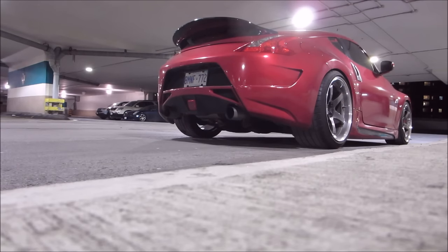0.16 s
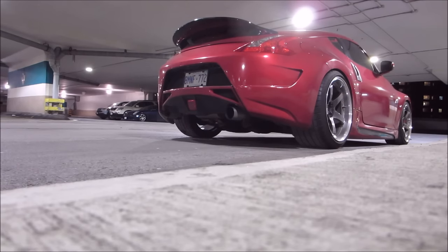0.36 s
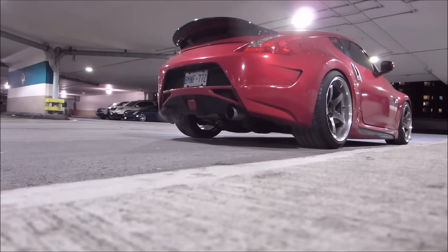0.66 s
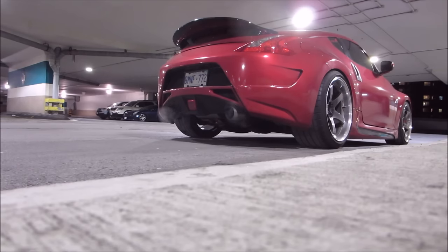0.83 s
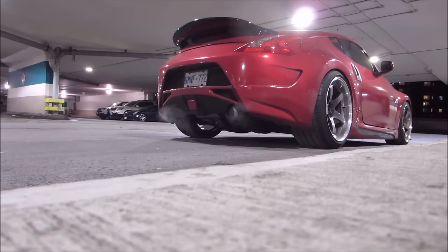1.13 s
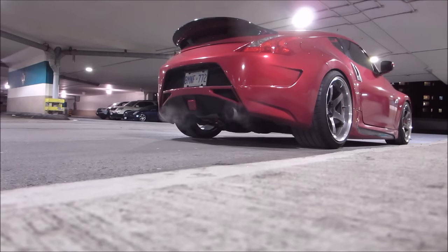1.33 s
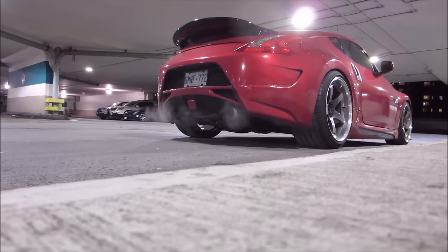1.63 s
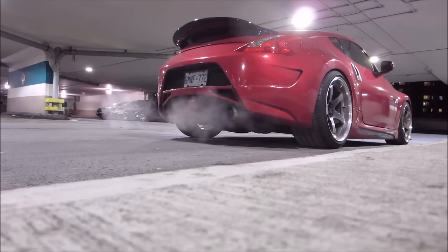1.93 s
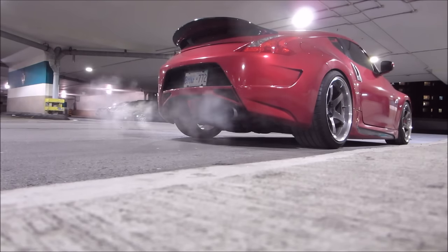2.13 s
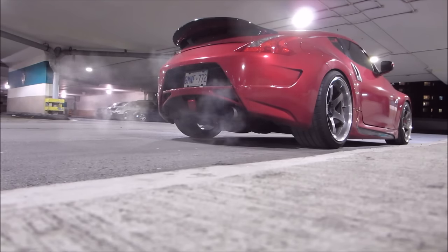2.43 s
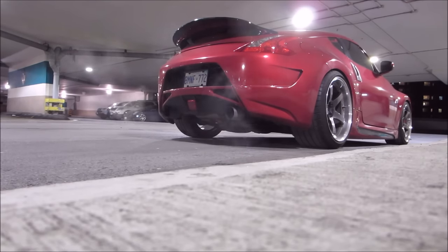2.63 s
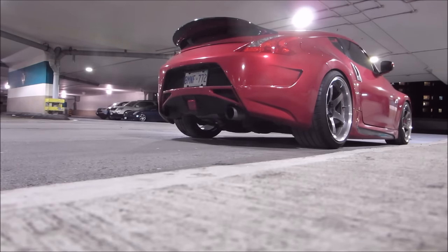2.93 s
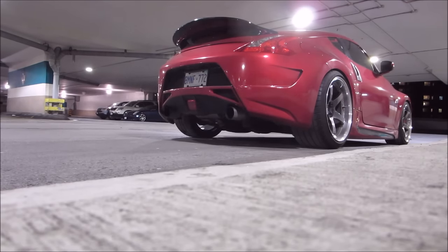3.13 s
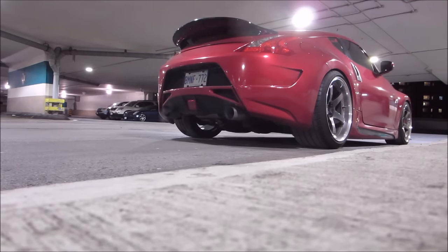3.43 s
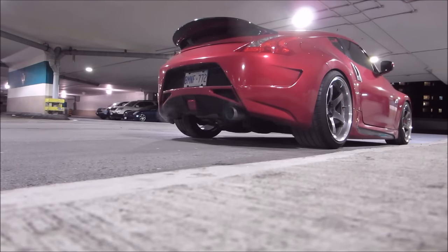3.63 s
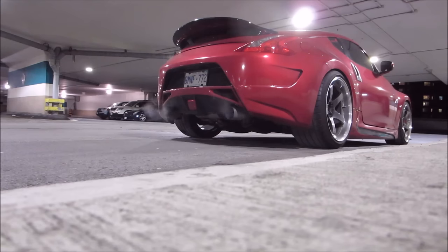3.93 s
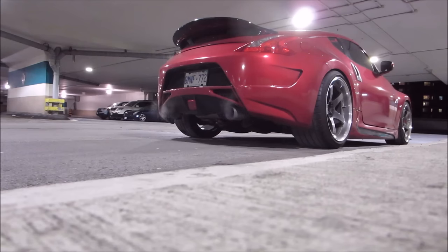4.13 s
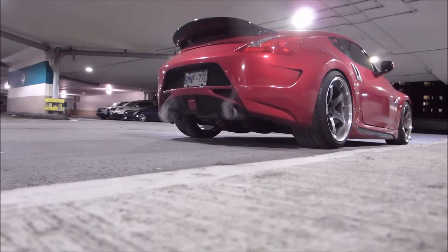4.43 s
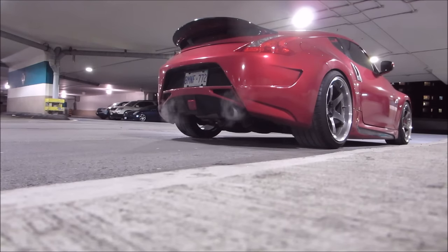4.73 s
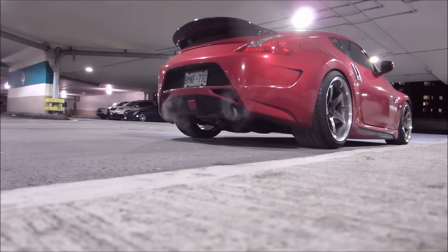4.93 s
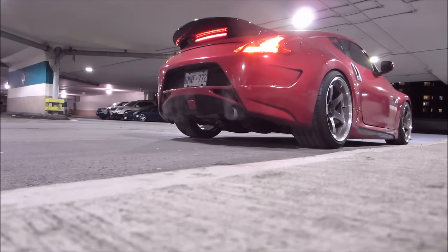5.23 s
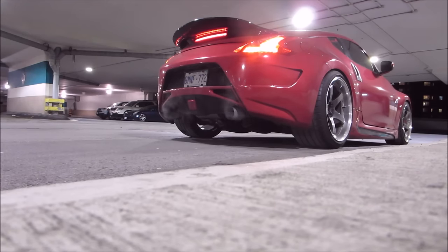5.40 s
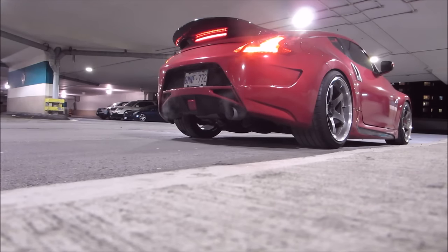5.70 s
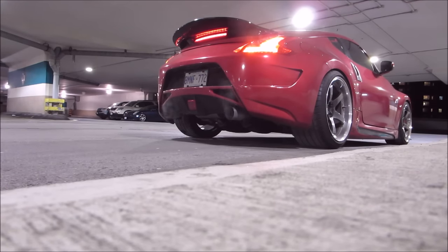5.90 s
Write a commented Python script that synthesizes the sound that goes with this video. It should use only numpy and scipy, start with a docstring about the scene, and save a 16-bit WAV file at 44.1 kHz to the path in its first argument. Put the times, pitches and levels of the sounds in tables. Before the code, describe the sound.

Loud exhaust blips and one hard, cracking rev boom through a concrete garage before the car settles into a low, uneven idle.

```python
"""Sports car revving in a concrete garage

A six-cylinder with an open exhaust sinks from one blip, flares again, crackles on the overrun and
settles to a lumpy idle. Each firing booms and barks through the pipes; the hardest ones crack.
Belts, fans and intake air sit underneath, and the brakes squeak faintly near the end.
The concrete answers with a long low tail, and a limiter holds down the loudest peaks."""
import sys
import numpy as np
from scipy import signal
from scipy.fft import rfft, irfft, next_fast_len
from scipy.io import wavfile
from scipy.ndimage import uniform_filter1d, minimum_filter1d, map_coordinates

SR = 44100
rng = np.random.default_rng(int(sys.argv[2]) if len(sys.argv) > 2 else 0)


def transcribe(u):
    """Save the signal u as a 16-bit wav file named by the first command-line argument.

    u: samples, shape (n,) or (channels, n), limited to [-1, 1]; the rate is SR.
    q: integer samples, one column per channel.
    """
    v = np.clip(np.atleast_2d(u).T, -1, 1)
    q = np.round(v * 32767).astype(np.int16)
    wavfile.write(sys.argv[1], SR, q)


N = 267246

# reverb time of the garage: f/Hz, t60/s
GARAGE_DECAY = [(100, 2.2), (300, 2.36), (600, 0.61), (1500, 0.49), (4000, 0.2), (12000, 0.26)]
# low standing waves of the garage: f/Hz, width/Hz, resonance against dry/dB
GARAGE_MODES = [(65.5, 3.1, -7), (196.7, 3.6, -2.5)]
# base stereo width of a diffuse field: f/Hz, side against mid/dB
STEREO_WIDTH = [(30, -22), (80, -59.5), (170, -26.5), (350, -15.5), (700, -10), (1400, -7), (2800, -5.5),
                (5500, -2.5), (12000, -0.5)]

# colour of the engine bay's whir: f/Hz, level/dB
WHIR_COLOUR = [(25, -21.5), (70, -7.5), (167, 1.5), (326, -12.5), (488, -16.5), (730, -17.5), (1210, -25.5),
               (1600, -30), (2850, -38), (4150, -48.5), (8000, -58.5), (15000, -83)]
# fader for belts, fans and, as the car creeps off, tyres: t/s, level/dB
WHIR_LEVEL = [(0, -35.5), (4.3, -37), (5, -36.5), (5.5, -34.5), (6.06, -31.5)]
# faint accessory whines: f/Hz, level/dB
ACCESSORY_WHINES = [(476, -48.5), (1205, -62)]
# colour of rushing air: f/Hz, level/dB
AIR_COLOUR = [(1500, 14), (4000, 17), (5500, 16.5), (8000, 12.5), (12000, 10), (14500, 6.5), (16000, -30.5)]
# brake squeaks: t/s, half-length/s, f/Hz, level/dB
BRAKE_SQUEAKS = [(5.669, 0.081, 3435, -61), (5.896, 0.018, 5830, -61)]

# engine speed as firings per second: t/s, f/Hz
FIRING_RATE = [(0.0, 225), (0.12, 187.6), (0.2, 196), (0.36, 173), (0.5, 155), (0.62, 145), (0.81, 124.6),
               (1.01, 102.5), (1.3, 80.8), (1.59, 67), (1.69, 83), (1.88, 140.6), (2.0, 176), (2.09, 194),
               (2.2, 200.5), (2.3, 205.5), (2.46, 197), (2.55, 170), (2.65, 176), (2.85, 148),
               (3.03, 133.6), (3.31, 107.6), (3.63, 73.1), (4.1, 52.2), (4.27, 55), (4.55, 48.8),
               (4.76, 46.6), (5.0, 40.6), (6.06, 41)]
# pulse size of the six cylinders in firing order, near and far bank in turn: level/dB
CYLINDER_ACCENTS = [3, -2, 1.5, -3, 3.5, -1]
# throttle moves (two blips, light touches as the revs fall, the idle):
# opens/s, shuts/s, load/0-1, bark lift/dB, snarl lift/dB, hiss level/dB
THROTTLE_MOVES = [(-.3, 0.164, 0.08, 6, 1.5, -51.5), (0.42, 0.695, 0, 1, 8.5, -85),
                  (1.08, 1.329, 0, 5, 3, -62.5), (1.61, 2.035, 0.81, 14, 6.5, -53.5),
                  (2.461, 2.538, 0.07, 6.5, 6.5, -77), (3.376, 3.631, 0, 4.5, 4, -64),
                  (4.409, 6.199, 0.09, 0, 0, -79)]
# standing waves in the tailpipes: f/Hz, width/Hz, resonance against dry/dB
PIPE_MODES = [(275, 17, 3.5), (369.6, 6.2, -12), (506, 5.3, -2.5), (646.7, 7, -6.5), (723, 19, 0.5),
              (879.6, 24, 0.5), (1410, 14, 2)]

# sharp exhaust cracks (hard firings at the top of the rev, pops as the revs fall):
# t/s, thump/dB, crack/dB, hiss/dB
CRACK_HITS = [(0.19, -4, -23.5, -52), (1.831, -0.5, -21.5, -45), (1.862, -10, -14, -46),
              (1.871, 5, -12, -47), (1.946, -3, -6, -30), (1.959, -2.5, -23.5, -27), (1.976, -5, -9, -33),
              (1.989, -32.5, 0.5, -19.5), (1.995, -2, -1, -23.5), (2.0, -14, -1.5, -35),
              (2.008, -16, -2, -39.5), (2.019, -9, -6.5, -19), (2.646, 5.5, -13, -56.5),
              (2.665, -4, -24.5, -52), (2.67, 0, -28, -46.5), (2.732, 6.5, -7.5, -33),
              (2.758, -8.5, -32.5, -55), (2.776, 0, -25, -44.5), (2.802, 1, -18.5, -47)]
# colour of a crack: f/Hz, level/dB
CRACK_COLOUR = [(200, -43), (1000, 19.5), (2500, 5), (4500, -17), (8000, -28), (15000, -49)]
# colour of the gas that each hit pushes out: f/Hz, level/dB
WHUMP_COLOUR = [(28, -40), (48, 0), (85, 5.5), (200, -34.5), (600, -74)]

# low-end response of the exhaust: f/Hz, level/dB
BOOM_COLOUR = [(25, -50.5), (42, -3.5), (65, -0.5), (95, -6.5), (127, 5), (172, 2), (205, -3.5),
               (250, -12.5), (330, -17), (500, -67.5)]
# fader for the low exhaust note: t/s, level/dB
BOOM_FADER = [(0.0, -17.5), (0.05, -30), (0.13, -16.5), (0.22, -20.5), (0.35, -11.5), (0.47, -26),
              (0.75, -25), (0.86, -28.5), (1.04, -30), (1.25, -20.5), (1.36, -31.5), (1.52, -39.5),
              (1.62, -30), (1.74, -16.5), (1.9, -23.5), (2.06, -18), (2.18, -18), (2.28, -22), (2.43, -33),
              (2.63, -16), (2.72, -31.5), (2.95, -25.5), (3.24, -31.5), (3.5, -24.5), (3.74, -27),
              (3.93, -34.5), (4.34, -37), (4.52, -30.5), (5.2, -31.5), (6.06, -34)]
# uneven firings take over at low revs: firing rate/Hz, share of the low note's power/0-1
LUMPINESS = [(42, .75), (60, .55), (90, .25), (200, .02)]
# colour of the clean upper firing orders: f/Hz, level/dB
SNARL_COLOUR = [(200, -18), (280, -10), (360, -4), (450, 3.5), (520, 2.5), (620, 2.5), (730, -1),
                (870, -12.5), (1200, -28.5)]
# colour of the pipes' bark: f/Hz, level/dB
BARK_COLOUR = [(40, -64), (100, -27.5), (170, -5.5), (280, -6.5), (330, -9.5), (400, -2.5), (520, 1.5),
               (620, -3.5), (760, -6.5), (900, -17.5), (1100, -30.5), (1400, -26), (2500, -40.5),
               (5000, -56), (15000, -110)]
# colour of the gas jet's rasp: f/Hz, level/dB
RASP_COLOUR = [(200, -55.5), (600, -15), (1000, 9.5), (1400, -7), (2000, -7.5), (2800, -12), (4000, -19),
               (7000, -36.5), (15000, -79)]
# colour of pressure fronts steepened under load: f/Hz, level/dB
SNAP_COLOUR = [(100, -79.5), (380, -30), (560, 10), (760, 19), (1000, 7.5), (1400, 6.5), (2800, -10.5),
               (4500, -25.5), (8000, -33.5), (15000, -73)]

OPEN_S, CLOSE_S = 0.086, 0.11  # the exhaust answers the throttle and falls back
BARK_OPEN_S, SNARL_FADE_S = 0.16, 0.05  # the bark's slower swell, the snarl's release
STEEPEN_LAG_S, STEEPEN_S = 0.1, 0.2  # the pressure fronts start later and take longer to build
CUT_START_S, CUT_END_S, CUT_DB = 2.2, 2.43, 5.5  # fuel is cut briefly after the big blip


def amp(db):
    """Decibels to gain."""
    return 10 ** (np.asarray(db) / 20)


def unit(x):
    """Scale to rms 1."""
    return x / np.sqrt(np.mean(x ** 2) + 1e-20)


def along(points, hz):
    """Read (f/Hz, value) points on a log axis."""
    f, v = np.transpose(points)
    return np.interp(np.log(hz + 1), np.log(f + 1), v)


def automation(points):
    """Draw (t/s, value) points as one value per sample."""
    return np.interp(np.arange(N) / SR, *np.transpose(points))


def wobble(rate):
    """A smooth random curve, rate knots a second."""
    knots = rng.standard_normal(int(N * rate / SR) + 4)
    return map_coordinates(knots, [np.arange(N) * rate / SR])


def gate(start, end, attack_s, release_s):
    """Attack, hold until the end, release: 0-1."""
    t = np.arange(N) / SR
    return np.clip((t - start) / attack_s, 0, 1) * np.clip(1 - (t - end) / release_s, 0, 1)


def by_speed(rate, db_at_100_hz, db_per_octave):
    """A level in dB that tracks the firing rate."""
    return db_at_100_hz + db_per_octave * np.log2(rate / 100)


def filtered(x, response):
    """Shape x with a complex frequency response."""
    n = x.shape[-1]
    size = next_fast_len(n + SR // 2)
    return irfft(rfft(x, size) * response(np.fft.rfftfreq(size, 1 / SR)), size)[..., :n]


def ring(x, colour, size=8192):
    """Let x ring a minimum-phase filter of the given colour."""
    cepstrum = irfft(np.log(amp(along(colour, np.fft.rfftfreq(size, 1 / SR)))))
    cepstrum[1:size // 2] *= 2
    cepstrum[size // 2 + 1:] = 0
    return signal.fftconvolve(x, irfft(np.exp(rfft(cepstrum))))[:N]


def diffuse(pair, wide_db):
    """Spread two unrelated signals as mid and side: centred in the bass, wide in the treble."""
    side = filtered(pair[1], lambda hz: amp(along(STEREO_WIDTH, hz) + wide_db))
    return np.array([pair[0] + side, pair[0] - side])


def rush(colour, wide_db):
    """Coloured stereo noise of rms 1."""
    noise = filtered(rng.standard_normal((2, N)), lambda hz: amp(along(colour, hz)))
    return unit(diffuse(noise, wide_db))


def garage(x, wet_db, build_s=0.0037):
    """Blend the direct sound with the concrete's reverb, which hangs longest in the bass."""
    hz, t, spectra = signal.stft(rng.standard_normal((2, 2 * SR)), SR, nperseg=256)
    decay = amp(-60 * t / along(GARAGE_DECAY, hz)[:, None])
    tail = signal.istft(spectra * decay, SR, nperseg=256)[1]
    tail *= 1 - np.exp(-np.arange(tail.shape[1]) / SR / build_s)
    midrange_gain = np.sqrt(np.mean(np.abs(rfft(tail[0])[400:2000]) ** 2))
    tail = diffuse(tail / midrange_gain, wide_db=-1)
    preroll = SR // 10  # the room is already ringing at the start
    running = np.pad(np.atleast_2d(x), ((0, 0), (preroll, 0)), mode="reflect")
    reverb = signal.fftconvolve(running, tail, axes=1)[:, preroll:preroll + N]
    return (x + amp(wet_db) * reverb) / np.hypot(1, amp(wet_db))


def standing_waves(x, modes):
    """Narrow resonances stay put while the engine's harmonics sweep through them."""
    def response(f):
        return 1 + sum(amp(db) * 1j * f * width / (hz * hz - f * f + 1j * f * width)
                       for hz, width, db in modes)
    return filtered(x, response)


def engine_bay(rate):
    """The bed: air rushes through the throttle over the whine and whir of belts and fans."""
    t = np.arange(N) / SR
    flow = amp(by_speed(rate, db_at_100_hz=-66, db_per_octave=8.7))
    for opens, shuts, *_, hiss_db in THROTTLE_MOVES:
        flow += amp(hiss_db) * gate(opens, shuts, attack_s=0.22, release_s=0.08)
    air = flow * amp(0.62 * wobble(33)) * rush(AIR_COLOUR, wide_db=1.5)
    whine = sum(amp(db + 2 * wobble(5.9)) * np.sin(2 * np.pi * hz * t + wobble(9.6))
                for hz, db in ACCESSORY_WHINES)
    whir = amp(automation(WHIR_LEVEL) + 0.42 * wobble(25)) * rush(WHIR_COLOUR, wide_db=1)
    return air + whine + whir


def brakes():
    """The pads sing briefly on the slowly turning discs."""
    t = np.arange(N) / SR
    squeaks = np.zeros(N)
    for peak_s, half_s, hz, db in BRAKE_SQUEAKS:
        swell = amp(db) * np.exp(-((t - peak_s) / half_s) ** 2)
        squeaks += swell * np.sin(2 * np.pi * hz * t + 1.89 * wobble(400))
    return garage(squeaks, wet_db=-1)


def exhaust_cracks(crack_s=0.0007, hiss_tail_s=0.018, hiss_tail_db=-15, whump_db=17.5):
    """Each hit is a thump in the pipes and a sharp crack, with a brief high hiss added after it."""
    blows, cracks, hisses = np.zeros((3, N))
    for start_s, thump_db, crack_db, hiss_db in CRACK_HITS:
        at = round(start_s * SR)
        blows[at], cracks[at], hisses[at] = amp([thump_db, crack_db, hiss_db])
    t = np.arange(SR // 8) / SR
    burst = t / crack_s * np.exp(1 - t / crack_s)
    hiss_tail = amp(hiss_tail_db) * np.exp(-t / hiss_tail_s)
    crack = signal.fftconvolve(cracks, burst)[:N] * rush(CRACK_COLOUR, wide_db=-11)
    hiss = signal.fftconvolve(hisses, burst + hiss_tail)[:N] * rush(AIR_COLOUR, wide_db=-0.5)
    thump = -ring(blows, BARK_COLOUR) / np.abs(ring(np.ones(1), BARK_COLOUR)).max()
    whump = amp(whump_db) * ring(blows, WHUMP_COLOUR)
    return garage(thump + whump, wet_db=-3) + garage(crack + hiss, wet_db=-8)


def effort(rate):
    """Revs and throttle ride the exhaust layers; bark and snarl duck while the fuel is cut."""
    load = np.zeros(N)
    bark_db = by_speed(rate, db_at_100_hz=-35.5, db_per_octave=13.75)
    snarl_offset_db = -8.5  # against the bark, throttle shut
    for opens, shuts, share, bark_lift_db, snarl_lift_db, _ in THROTTLE_MOVES:
        load += share * gate(opens + STEEPEN_LAG_S, shuts, STEEPEN_S, CLOSE_S)
        bark_db += bark_lift_db * gate(opens, shuts, BARK_OPEN_S, CLOSE_S)
        snarl_offset_db += snarl_lift_db * gate(opens, shuts, OPEN_S, SNARL_FADE_S)
    bark_db -= CUT_DB * gate(CUT_START_S, CUT_END_S, OPEN_S, CLOSE_S)
    load = np.clip(load, 0, 1)
    rasp_db = by_speed(rate, db_at_100_hz=-50.5, db_per_octave=16.9) + 20.5 * load
    return load, bark_db, bark_db + snarl_offset_db, rasp_db


def firings(rate, cycles, uneven, scatter_db, jitter):
    """One pulse per firing, sized by its cylinder and by the chance of combustion."""
    number = np.arange(1, int(cycles[-1]))
    timing, strength = rng.standard_normal((len(number), 2)).T
    position = np.interp(number + jitter * timing, cycles, np.arange(N))
    at, late = position.astype(int), position % 1  # each pulse straddles two samples
    size_db = uneven * np.take(CYLINDER_ACCENTS, number, mode="wrap") + scatter_db * strength
    size = amp(size_db) / np.sqrt(rate[at])  # even power at any speed
    pulses = np.bincount(at, size * (1 - late), N + 1) + np.bincount(at + 1, size * late, N + 1)
    return pulses[:N]


def boom(rate, cycles, top_order=6):
    """Low firing orders stand out as they cross the exhaust's resonance; near idle they turn lumpy."""
    level = amp(automation(BOOM_FADER))
    orders = np.arange(1, top_order + 1)[:, None]
    flutter_db = 0.65 * np.array([wobble(8.6) for _ in orders])
    gains = amp(along(BOOM_COLOUR, orders * rate) + flutter_db)
    gains /= np.linalg.norm(gains, axis=0)
    tone = unit(np.sum(gains * np.sin(2 * np.pi * orders * cycles), axis=0))
    pulses = firings(rate, cycles, uneven=1.4, scatter_db=2.5, jitter=0.04)
    throb = unit(ring(pulses, BOOM_COLOUR))
    lumpy = np.clip(along(LUMPINESS, rate), 0, 1)
    hum = garage(level * np.sqrt(1 - lumpy) * tone, wet_db=-11)
    return hum + garage(level * np.sqrt(lumpy) * throb, wet_db=-4)


def snarl(rate, cycles, level_db, top_order=7):
    """Even combustion gives upper orders that flutter as they glide through the pipes' resonances."""
    orders = np.arange(2, top_order + 1)[:, None]
    motion = np.array([(3 * wobble(16), 0.35 * wobble(40)) for _ in orders])
    flutter_db, phase_drift = motion.swapaxes(0, 1)
    gains = amp(along(SNARL_COLOUR, orders * rate) + flutter_db)
    partials = gains * np.cos(2 * np.pi * orders * cycles + phase_drift)
    tone = partials.sum(axis=0) / np.linalg.norm(gains, axis=0)
    return garage(amp(level_db) * unit(tone), wet_db=-4)


def bark(rate, cycles, load, bark_db, rasp_db):
    """Each firing rings the pipes and puffs out turbulent gas; load steepens its front to a snap."""
    loose_pulses = firings(rate, cycles, uneven=1, scatter_db=3, jitter=0.025)
    body = amp(bark_db) * unit(ring(loose_pulses, BARK_COLOUR))
    tight_pulses = firings(rate, cycles, uneven=0.4, scatter_db=1.5, jitter=0.02)
    snap = load * unit(ring(tight_pulses, SNAP_COLOUR))
    chuff = unit(np.exp(2 * np.cos(2 * np.pi * cycles)))  # one swell per firing
    puffs = np.sqrt(1 - load ** 2) * chuff * rush(RASP_COLOUR, wide_db=-2.5)
    rasp = garage(amp(rasp_db + 6.5) * snap, wet_db=-5) + garage(amp(rasp_db) * puffs, wet_db=13.5)
    return rasp + garage(body, wet_db=2)


def scene():
    """The mix: bark, snarl and boom lock to one crankshaft, with cracks, engine bay and brakes added."""
    rate = automation(FIRING_RATE) * (1 + 0.003945 * wobble(14))
    cycles = np.cumsum(rate) / SR  # firings so far
    load, bark_db, snarl_db, rasp_db = effort(rate)
    cracks = exhaust_cracks()
    exhaust = bark(rate, cycles, load, bark_db, rasp_db) + snarl(rate, cycles, snarl_db)
    pipes = standing_waves(exhaust + cracks, PIPE_MODES)
    low_end = standing_waves(boom(rate, cycles), GARAGE_MODES)
    return low_end + pipes + engine_bay(rate) + brakes()


def record(dry, low_hz=45, top_hz=15800, ceiling=0.76, window_samples=89):
    """Master chain: thin the deep bass, limit the loudest peaks, cut off the very top."""
    thinned = filtered(dry, lambda hz: (1j * hz / (low_hz + 1j * hz)) ** 2)
    needed = ceiling / np.maximum(np.abs(thinned).max(axis=0), ceiling)
    gain = uniform_filter1d(minimum_filter1d(needed, window_samples), window_samples)
    return filtered(thinned * gain, lambda hz: hz < top_hz)


dry = scene()
out = record(dry)
transcribe(out)
```